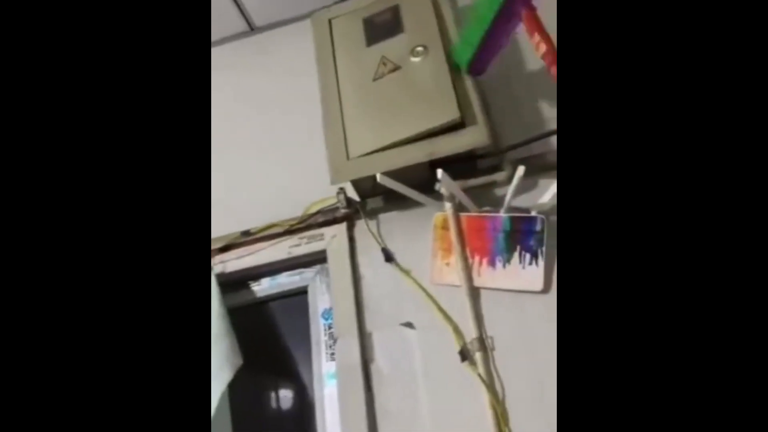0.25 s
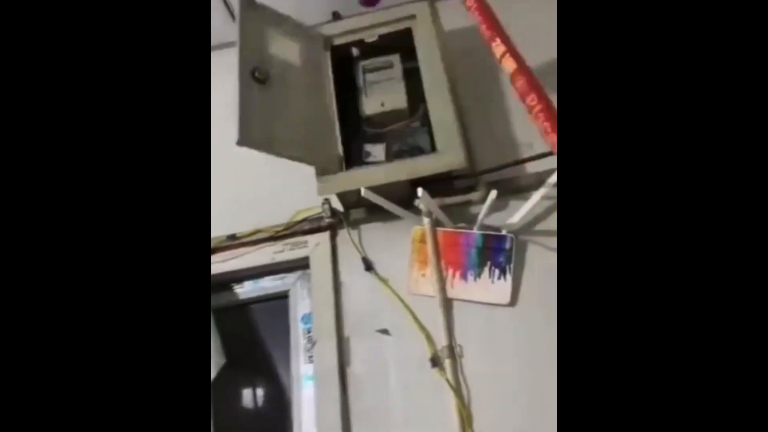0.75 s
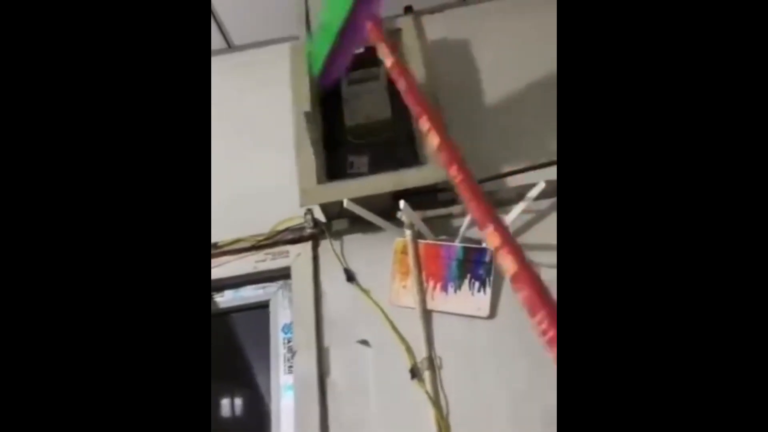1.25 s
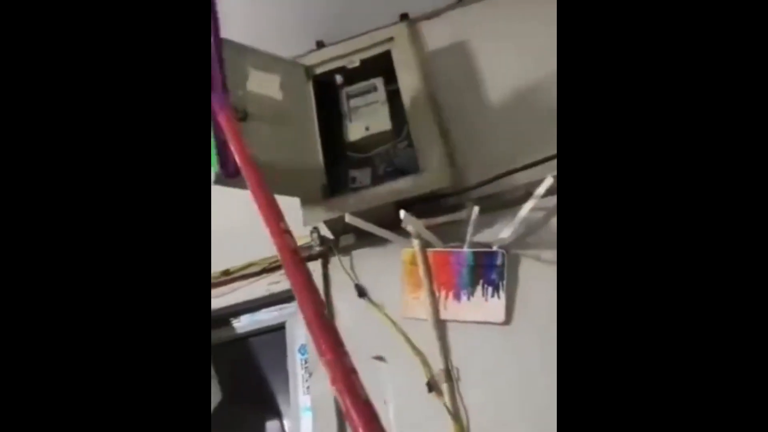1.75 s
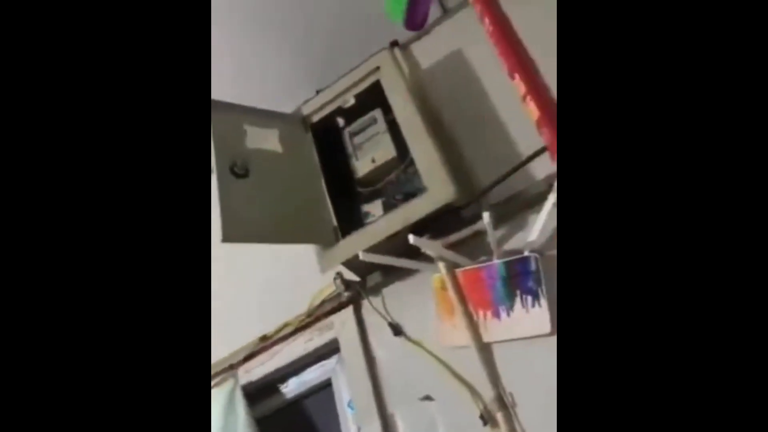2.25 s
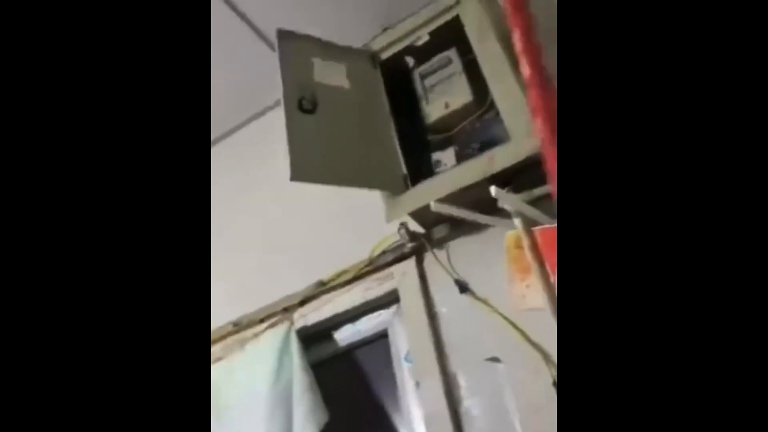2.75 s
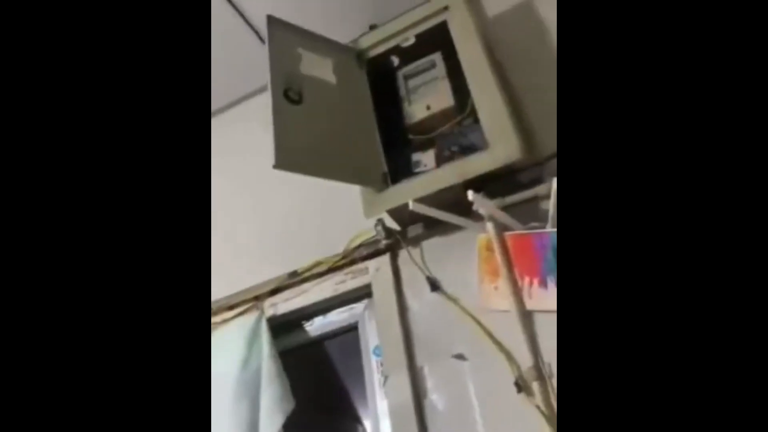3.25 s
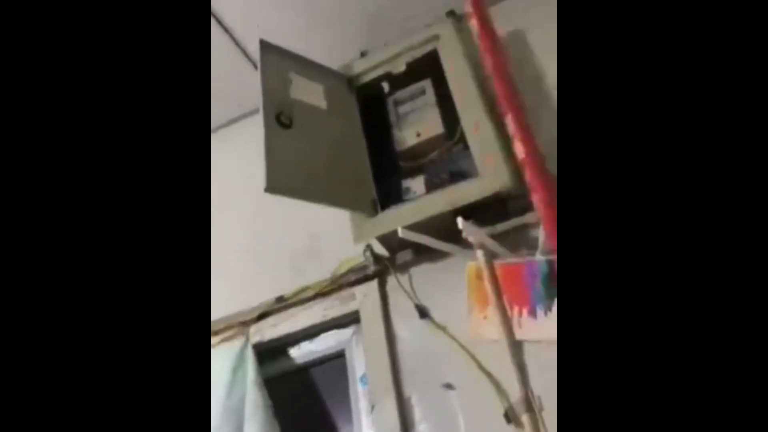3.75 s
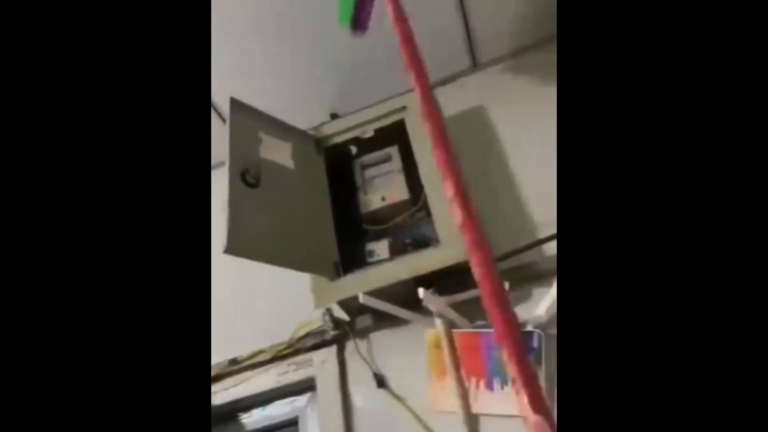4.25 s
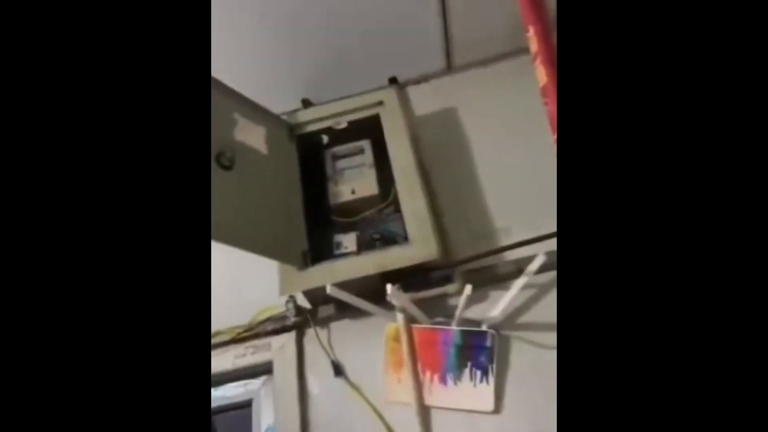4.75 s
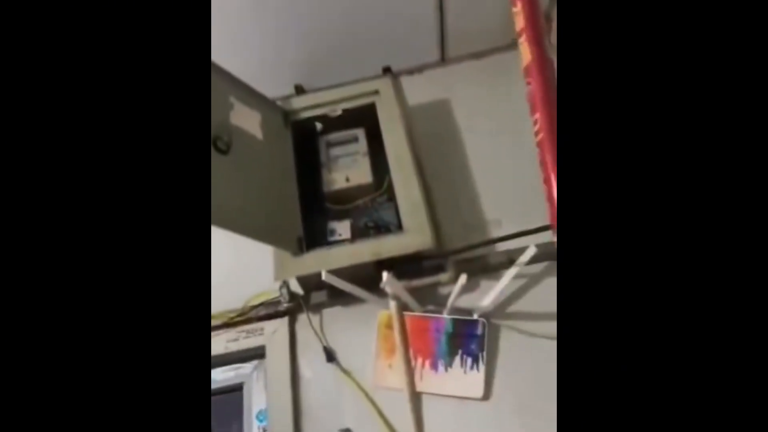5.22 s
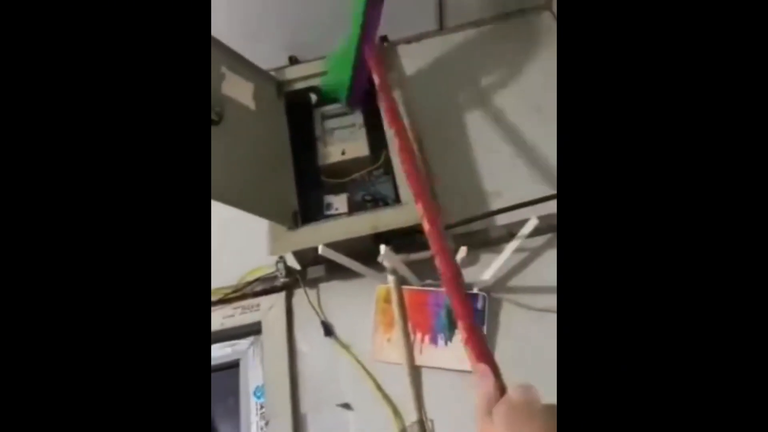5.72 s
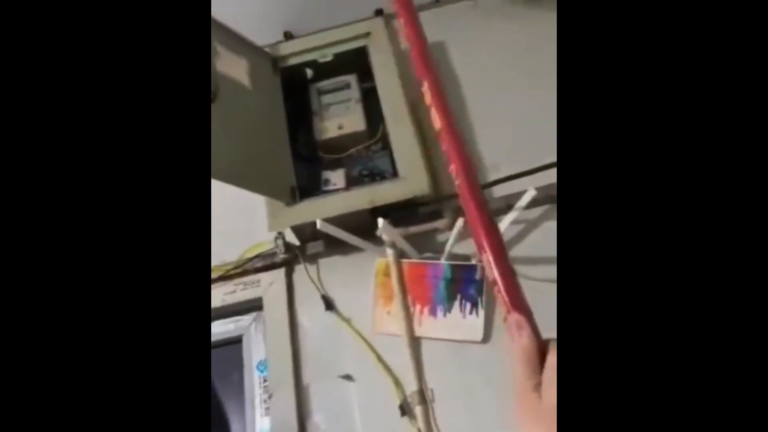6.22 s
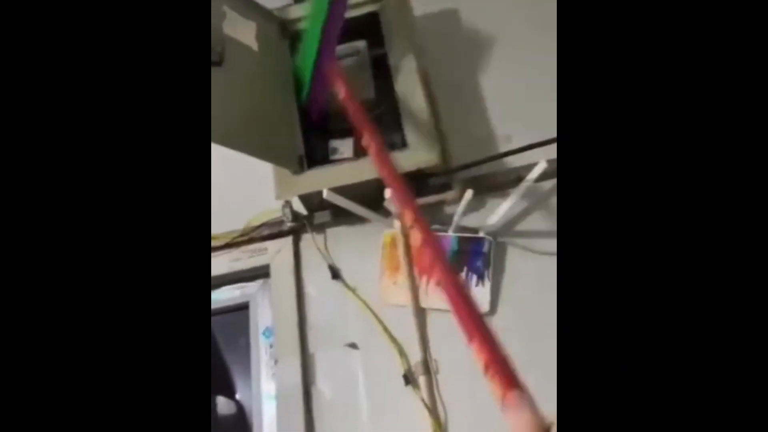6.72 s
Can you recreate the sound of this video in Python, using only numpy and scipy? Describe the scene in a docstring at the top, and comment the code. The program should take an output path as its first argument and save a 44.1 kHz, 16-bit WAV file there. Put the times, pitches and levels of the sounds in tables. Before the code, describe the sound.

A broom hits a sheet-metal wall cabinet close to the microphone in a bare room. From 0.1 to 0.8 seconds there are quiet ticks, knocks and bristly scrapes. A moderate tinny clatter comes at 1.1 to 1.5, then fades to faint murmur, hiss and wavering hum. Small low knocks at 2.15 to 2.25 lead to a loud hollow bang at 2.7, ringing with a short rattle. Another bang lands at 3.45 with a low thud just after, then a third at 3.96, whose door shudders and booms past 4.1. A lighter clack sounds at 4.56, followed by near quiet. At 5.5 a heavy bang booms deeply, its loose rattle fading by 6. At 6.33 a sharp, bright crack dips briefly, then bursts into dense clanking and jangling metal that slowly decays to the end near 7.

```python
"""In a bare room, a broom knocks and scrapes a sheet-metal wall cabinet and its door, near the microphone.
Each blow cracks and thumps, then noise rings through the door's modes as a dying rattle.
Clanks, low thuds and box booms are fading tones; the door shudders on after the hardest blows; low noise booms.
Behind them lies a room tone of murmur, hiss and a faint wavering hum, all of it filtered noise."""
import sys
import numpy as np
from scipy import signal
from scipy.fft import rfft, irfft, next_fast_len
from scipy.io import wavfile
from scipy.ndimage import uniform_filter1d, minimum_filter1d, map_coordinates

SR = 44100
rng = np.random.default_rng(int(sys.argv[2]) if len(sys.argv) > 2 else 0)


def to_wav(s):
    """Save 16-bit WAV."""
    ch = np.atleast_2d(s).T  # columns
    pcm = np.round(np.clip(ch, -1, 1) * 32767)  # PCM
    wavfile.write(sys.argv[1], SR, pcm.astype(np.int16))


N = 307804


def amp(db):
    """Gain of a level in dB."""
    return 10 ** (np.asarray(db) / 20)


def unit(x):
    """x at rms 1."""
    return x / np.sqrt(np.mean(x ** 2) + 1e-20)


def along(points, hz):
    """Value at hz between (Hz, value) points on a log frequency axis."""
    f, v = np.transpose(points)
    return np.interp(np.log(hz + 1), np.log(f + 1), v)


def curves(rows):
    """One value per sample for each column after the time."""
    s, *cols = np.transpose(rows)
    return [np.interp(np.arange(N) / SR, s, c) for c in cols]


def wobble(rate):
    """A smooth random curve, rate knots a second."""
    return map_coordinates(rng.standard_normal(int(N * rate / SR) + 4), [np.arange(N) * rate / SR])


def filtered(x, response):
    """x times a response of frequency."""
    n = x.shape[-1]
    m = next_fast_len(n + SR // 10)
    return irfft(rfft(x, m) * response(np.fft.rfftfreq(m, 1 / SR)), m)[..., :n]


def noise(spectrum):
    """Coloured noise of rms 1."""
    return unit(filtered(rng.standard_normal(N), lambda hz: amp(along(spectrum, hz))))


def peak(hz, centre_hz, width_hz):
    """A resonance of height 1."""
    return 1 / (1 + (2 * (hz - centre_hz) / width_hz) ** 2)


def patches(shape, bands, frames):
    """Random map of rms 1 over frequency and time, smoothed across so many bands and frames."""
    smooth = uniform_filter1d(rng.standard_normal(shape), size=bands, axis=0)
    return unit(uniform_filter1d(smooth, size=frames, axis=1))


def cabinet():
    """Each blow swells and cracks, then the rattle dies faster towards its end, at a pace set by pitch."""
    # Blows and scrapes. Each row: start in seconds, strength in dB, thump, body, clang and bristle hiss in dB,
    # t60 in seconds (scaled by pitch below), rise in seconds (2 ms at least), tick in dB,
    # knock in Hz, knock in dB. The levels are relative.
    blows = [(0.114, -52.5, -7, 1, 9.5, 15.5, 1, 0.017, -35, 263, 12),
             (0.239, -36.5, -4, -18, 0, -11, 1, 0.0072, -8, 713, 12.5),
             (0.282, -41.5, -9, 5, -0.5, 10, 0.82, 0.043, -18, 320, 20),
             (0.324, -35, -14, -3, 3.5, 4.5, 0.44, 0.0022, 4.5, 188, -2),
             (0.395, -38, -7, -4.5, 2, -28, 1, 0.01, 1, 1013, 14.5),
             (0.457, -56.5, -8, -5, 7, 18.5, 0.86, 0.017, -16, 142, 44),
             (0.621, -36.5, -5, -24, -1, -2, 0.24, 0.006, -1, 338, 13),
             (0.676, -28.5, -11.5, -8, 0.5, 0.5, 0.52, 0.05, -13, 178, 5),
             (0.769, -40, -15, -1.5, -6.5, -16, 1, 0.0015, -11, 138, 31.5),
             (1.133, -25, -9.5, -13.5, 0, 5, 0.68, 0.0093, -18, 1214, 7.5),
             (1.28, -24, -5, -7.5, -1.5, -0.5, 0.41, 0.0018, -1, 852, 12.5),
             (1.337, -25.5, -15, -9, -0.5, -1.5, 0.61, 0.022, -6, 166, 12.5),
             (1.473, -32, -7, -6, 3, 1.5, 1, 0.024, 0.5, 189, -9),
             (1.539, -46.5, -1, 1, -2, 8, 0.41, 0.019, -15, 332, 28),
             (1.682, -48.5, -5, -17, 5, 11, 0.53, 0.028, -1, 240, 23),
             (2.152, -39.5, 3, -9, -10, -18, 0.29, 0.022, -11, 340, 19),
             (2.217, -33.5, -9, -2.5, -6.5, -8, 0.23, 0.059, -3, 333, 8),
             (2.238, -44.5, -31, -10, -4, 2, 0.5, 0.01, -15, 1164, 26),
             (2.256, -38.5, -31, -10, -9, -3.5, 0.56, 0.0054, -8, 930, 14),
             (2.495, -43, -27, -2.5, -3, 3.5, 0.15, 0.011, -6, 232, 9),
             (2.602, -42.5, -29, -21, 2, 10, 0.9, 0.066, -27, 236, 0),
             (2.693, -9.5, -13.5, -11.5, -2.5, 1, 0.6, 0.0086, -32, 437, 2),
             (3.068, -51.5, -1, -5.5, 2.5, 12.5, 0.49, 0.042, 1, 151, 14),
             (3.269, -61.5, 6, -3, 14, 15, 1, 0.0049, 11, 141, 0),
             (3.443, -12, -12.5, -12, -1, 1, 0.85, 0.0076, 4, 192, 10),
             (3.549, -26, 0.5, -2.5, 1.5, -1.5, 0.36, 0.01, -24, 159, 3),
             (3.762, -42.5, 0.5, -15, -21, -6.5, 0.74, 0.01, -14, 179, -4),
             (3.796, -36, -14, -9, -34, -28, 0.15, 0.012, -9, 742, 14.5),
             (3.956, -10, -14.5, -10, -1, -2.5, 0.48, 0.007, -13, 421, 6),
             (4.02, -27.5, -12.5, -2, 3, -20, 0.93, 0.0071, -28, 147, -8),
             (4.098, -35.5, -10, 3.5, 3, 13, 0.23, 0.005, 13, 2530, 9),
             (4.14, -34.5, 6, 4, 4, -17, 0.6, 0.018, -9, 146, -1),
             (4.447, -35.5, 0.5, -4, -23.5, -25, 0.88, 0.069, -8, 164, 10),
             (4.56, -21, -34, -15, -9, -22.5, 0.64, 0.004, 2, 807, 10),
             (5.491, -28, -12, -18, 9, 17.5, 0.46, 0.0067, -14, 220, 4),
             (5.515, -9.5, -12, -8.5, -4, -23.5, 0.63, 0.0081, -4.5, 198, 10.5),
             (5.613, -31, -17, -3.5, -9, -10.5, 0.94, 0.0088, -1, 352, 20.5),
             (5.74, -30, -24, -1, -4, -12.5, 0.72, 0.028, -18, 500, 2),
             (5.803, -25.5, -33, -3.5, -11, -34, 0.6, 0.012, -19.5, 642, 6.5),
             (6.001, -37.5, -5.5, 0, -18, -10, 0.55, 0.0047, -3, 792, 14.5),
             (6.313, -42, -17, -16, 15, 21.5, 0.18, 0.0051, -21, 147, -12),
             (6.329, -8, -24, -11, 6.5, -1.5, 0.1, 0.0028, 2, 970, -13),
             (6.367, -18.5, -20, -9, -2, -21, 0.48, 0.02, -13, 506, 15),
             (6.46, -13, -25, -12, -8, -10.5, 0.98, 0.046, -21, 684, 8.5)]
    # How long each pitch lasts. Each row: frequency in Hz, share of the blow's t60.
    lasting = [(150, 1.17), (700, 0.52), (3000, 0.66), (9000, 0.69)]
    crack_db, crack_t60, tick_t60 = -11, 0.31, 0.029  # contact over the rattle; seconds
    lead, size = SR // 16, SR * 7 // 8  # samples ahead of the start, and in all
    out = np.zeros(N + lead + size)
    t = (np.arange(size) - lead) / SR
    for s, db, thump_db, body_db, clang_db, hiss_db, t60, rise, tick_db, knock_hz, knock_db in blows:
        since = t - 0.49 * rise  # time after the loudest moment
        after = np.clip(since, 0, None)

        hz, frame, z = signal.stft(rng.standard_normal(size), SR, nperseg=256)
        lifetime = np.clip(t60 * along(lasting, hz)[:, None], .02, 9)
        age = np.clip(frame - lead / SR, 0, None) / lifetime
        z = z * amp(2.1 * patches(z.shape, 4, 8) - 60 * age ** 1.21)
        rattle = signal.istft(z, SR, nperseg=256)[1][:size]
        flicker_db = 0.78 * np.interp(t, t[::220], rng.standard_normal(len(t[::220])))
        rattle = rattle * amp(flicker_db) * chatter(size, 90, -11)

        crack = amp(crack_db - 60 * after / crack_t60)
        tick = amp(tick_db - 60 * after / tick_t60)
        rattle = rattle * (1 + crack + tick)

        tilt = [(190, thump_db + 0.5), (370, body_db), (650, 1.3), (1300, 0.3), (2200, clang_db + 0.5),
                (3200, 0.7 * clang_db + 0.43 * hiss_db + 3.5), (4800, hiss_db + 4.0)]
        rattle = through_door(rattle, tilt, knock_hz, knock_db)

        # each rattle is levelled by its first moments, apart from its tilt
        bins = np.arange(24, 160)
        start = np.abs(rfft(rattle[lead:lead + 2048]))[bins]
        untilt = amp(-2 * along(tilt, bins * SR / 2048))
        rattle = rattle / np.sqrt(np.mean(start ** 2 * untilt))

        swell = amp(-11 * np.clip(-since, 0, None) / max(rise, .002))
        # the struck spot swings a few times at its own pitch
        swing = np.sin(2 * np.pi * knock_hz * t + rng.uniform(0, 2 * np.pi))
        knock = swell * amp(knock_db - 52.5 - 60 * after / 0.15) * swing
        fade = np.clip(10 * (t[-1] - t), 0, 1)
        out[round(s * SR):][:size] += amp(db + 38.5) * swell * fade * (rattle + knock)
    return out[lead:lead + N]


def through_door(x, tilt, knock_hz, knock_db):
    """x rings the sheet; two random colourings of the rattle fade back and forth."""
    # Colour of the sheet's rattle. Each row: frequency in Hz, relative level in dB.
    sheet = [(65, -17.5), (110, 5), (242, 2.5), (333, -1), (366, -4), (450, -9.5), (1200, -13.5),
             (1840, -15), (2140, -14.5), (3980, -18.5), (8760, -30), (9800, -28), (12700, -68),
             (21600, -120)]
    trade_hz = 5.15
    t = np.arange(len(x)) / SR
    share = .5 + .5 * np.sin(2 * np.pi * trade_hz * t + rng.uniform(0, 2 * np.pi))

    def ring(hz):
        """Sheet colour and tilt times a fresh draw of the door's modes."""
        return amp(along(sheet, hz) + along(tilt, hz)) * door_modes(hz, knock_hz, knock_db)

    one = filtered(x, ring)
    other = filtered(x, ring)
    return share * one + (1 - share) * other


def door_modes(hz, knock_hz, knock_db):
    """The door's modes, at new strengths on every call, over a dense mass of small ones."""
    # Door modes. Each row: frequency in Hz, width in Hz, mean level over the rattle in dB.
    modes = [(201.6, 14, -5.5), (337, 84, -3), (398.6, 4.5, 14), (449.4, 17, 4), (498, 57, 5.5),
             (633, 5.3, 3), (717, 24, 0.5), (765, 11, 3.5), (860, 7.4, -2.5), (943, 8.8, -7.5),
             (1032, 33, 1), (1120, 4.6, 5), (1230, 86, -8), (1355, 110, -5), (1506, 36, 1), (1680, 126, -1),
             (1864, 50, -2), (2045, 36, -5.5), (2308, 31, -3), (2485, 94, -3.5), (2600, 15, -5.5),
             (2610, 170, -7), (2764, 77, -6), (2990, 94, -3), (3220, 75, -4.5), (3440, 16, -21),
             (3600, 12, 3.5), (3916, 72, -3.5), (4200, 14, -0.5), (4500, 11, 5)]
    lift = sum(amp(db + rng.normal(0, 0.6)) * peak(hz, centre, width) for centre, width, db in modes)
    knock = amp(knock_db - 9.5) * peak(hz, knock_hz, 47)
    small = map_coordinates(rng.standard_normal(1200), [hz / 30])  # a knot every 30 Hz
    return (1 + lift + knock) * amp(3.1 * small)


def chatter(size, rate, loud_db):
    """Gain of loose parts ticking at random moments over the rattle, rate ticks a second."""
    ticks = (rng.random(size) < rate / SR) * rng.exponential(1, size)
    decay = amp(-60 * np.arange(SR // 20) / SR / 0.0088)  # t60 of 8.8 ms
    return 1 + amp(loud_db) * signal.fftconvolve(ticks, decay)[:size]


def clanks():
    """Each tone is slightly unsteady: it swells, crests at its loudest moment and dies."""
    # Panel clanks, low thuds and box booms as single tones. Each row: loudest moment in seconds,
    # frequency in Hz, peak in dB, time to gain 8 dB in seconds (2 ms at least), t60 in seconds (30 ms at least).
    tones = [(0.334, 1157, -38, 0.0066, .1), (0.4, 1102, -36, 0.0084, 0.08), (0.325, 1940, -31, .002, .04),
             (1.14, 4020, -33, .006, 0.072), (1.282, 900, -23, .002, .04), (1.349, 3940, -31, .008, 0.11),
             (1.48, 2500, -37, .006, .15), (1.292, 2537, -26, .006, 0.084), (1.356, 341, -28, .012, 0.14),
             (2.159, 117, -25, 0.0088, 0.091), (2.2, 960, -41, 0.024, .15),
             (2.223, 384, -21.5, 0.0076, 0.094), (2.263, 385, -18, .007, .045),
             (2.696, 188, 1, 0.0023, 0.056), (2.714, 210, -15.5, .004, 0.045),
             (2.715, 654, -16.5, 0.0074, 0.16), (2.727, 481, -15, .02, 0.18), (2.75, 183, -11, 0.017, 0.14),
             (2.784, 1156, -25, 0.013, 0.098), (2.79, 221, -18, 0.015, .12), (2.825, 150, -24, .008, .1),
             (2.859, 139.5, -21, 0.021, 0.18), (3.448, 192, -1.5, 0.0027, 0.11),
             (3.458, 458, -13.5, 0.0059, 0.12), (3.488, 336, -19.5, 0.013, 0.16),
             (3.555, 104, -8.5, 0.0033, 0.037), (3.952, 190, -11.5, 0.0036, .05),
             (3.972, 183, -10, 0.0043, 0.11), (3.978, 439, -7, 0.0064, .1),
             (3.97, 1050, -13, 0.0064, 0.054), (3.954, 2670, -16, 0.0027, 0.07),
             (4.047, 95, -14, .004, 0.072), (4.024, 85, -11, .004, .08), (3.967, 2420, -18, 0.0057, 0.07),
             (3.965, 642, -9.5, 0.0045, 0.074), (4.025, 1340, -23.5, .006, .1),
             (4.106, 2490, -25, 0.0195, .2), (4.144, 146.5, -12.5, 0.0093, 0.19),
             (4.566, 900, -24, .003, .08), (4.576, 520, -22.5, 0.0058, 0.071),
             (4.67, 480, -31.5, 0.022, 0.09), (5.519, 199, -8.5, 0.004, 0.062),
             (5.52, 907, -10, 0.0022, 0.066), (5.521, 2530, -13, 0.0068, 0.072),
             (5.536, 80, -9.5, 0.009, .15), (5.585, 52, -14, 0.017, .25), (5.68, 51.6, -15.5, 0.028, .3),
             (5.79, 53.8, -17, .03, 0.38), (5.537, 713, -13.5, 0.0071, .12),
             (5.616, 1010, -24, 0.0102, .12), (5.64, 1224, -30, .02, 0.13), (5.6, 302, -24, .02, .2),
             (5.729, 109, -20, .008, .1), (5.775, 110.5, -20.5, .01, .12), (5.762, 1025, -34, .008, 0.12),
             (5.65, 344.4, -20, 0.081, 0.35), (5.92, 348, -38.5, 0.024, 0.21),
             (6.327, 2770, -6, 0.0018, .03), (6.36, 484, -27, .004, .05), (6.372, 960, -27, .006, .1),
             (6.413, 70, -20, 0.022, 0.27), (6.376, 322, -20.5, 0.0051, 0.093),
             (6.42, 293, -16, .008, 0.077), (6.455, 658, -16, 0.011, .35), (6.476, 1860, -14.5, .015, 0.17),
             (6.451, 934, -18.5, .01, .12), (6.465, 2950, -18.5, 0.019, 0.18),
             (6.485, 782, -14.5, 0.0096, 0.17), (6.485, 515, -15, 0.023, .15), (6.505, 56, -16.5, .03, .3),
             (6.516, 1006, -18, 0.012, .12), (6.537, 284, -14.5, .01, 0.25), (6.565, 1920, -20, .015, 0.18),
             (6.599, 1610, -23, 0.011, .15), (6.61, 700, -21.5, .015, .2), (6.626, 58.4, -17.5, .04, 0.5),
             (6.77, 67, -21, .03, .3), (6.495, 453, -10, .03, 0.27), (6.531, 335, -18, 0.0061, 0.1),
             (6.55, 581, -17, .012, .15), (6.644, 486, -21, 0.036, 0.24), (6.67, 343, -18.5, 0.022, 0.17),
             (6.683, 149, -21, .015, 0.21), (6.69, 679, -19.5, .015, 0.14), (6.7, 1810, -21, .012, 0.18),
             (6.732, 328, -14.5, 0.013, .15), (6.782, 2820, -30, .02, 0.34),
             (6.814, 486, -19.5, 0.0087, 0.32), (6.86, 428, -21, 0.01, 0.21),
             (6.959, 452, -26.5, 0.025, .15)]
    t, out = np.arange(N) / SR, np.zeros(N)
    drift = np.cumsum(wobble(40)) / SR
    for s, hz, db, rise, t60 in tones:
        near = slice(round((s - .1) * SR), round((s + .4) * SR))
        since = t[near] - s
        level_db = db - np.where(since < 0, -8 * since / max(rise, .002), 60 * since / max(t60, .03))
        unsteady = since + 0.00445 * (drift[near] - drift[round(s * SR)])
        out[near] += amp(level_db) * np.cos(2 * np.pi * hz * unsteady)
    return out


def shudder():
    """Loose sheet clatters on through the door's modes, now these, now those: it sets in, swells and fades."""
    # The door after the hardest blows. Each row: start in seconds, swell in seconds, start level in dB,
    # peak level in dB, fading in dB per second, then bass, body and treble tilt in dB.
    shudders = [(4.03, 0.072, -24.5, -16, 104, -1, 3, 10.5), (5.539, 0.1, -33.5, -16.5, 91, 5, 2, 6.5),
                (6.372, 0.07, -26, -13, 20, -10, 2, 7)]
    rise_s = 0.045  # time to gain 40 dB before the start
    rise_s, fall_db = rise_s, 40
    lead, size = SR // 20, SR
    t, out = (np.arange(size) - lead) / SR, np.zeros(N + size)
    for s, swell, start_db, db, fading_db, bass_db, body_db, treble_db in shudders:
        level_db = np.interp(t, [0, swell], [start_db, db]) - fading_db * np.clip(t - swell, 0, None)
        level_db = level_db - fall_db * np.clip(-t, 0, None) / rise_s
        tilt = [(200, bass_db), (420, body_db), (750, 5.5), (1400, 4.8),
                (4000, treble_db), (8000, treble_db - 3.5)]
        z = signal.stft(rng.standard_normal(size) * chatter(size, 140, -23.5), nperseg=512)[2]
        clatter = signal.istft(z * amp(3.35 * patches(z.shape, 3, 7)), nperseg=512)[1][:size]
        clatter = clatter * amp(0.24 * wobble(43) + 0.87 * wobble(12.15))[:size]
        clatter = through_door(clatter, tilt, 610, 3.8)
        out[round(s * SR) - lead:][:size] += amp(level_db) * unit(clatter)
    return out[:N]


def boom():
    """Low noise from the shaken box: each boom rises fast and dies away, in lumps, over a steady rumble."""
    # Box and wall booming after blows. Each row: loudest moment in seconds, peak in dB,
    # t60 in seconds (50 ms at least).
    booms = [(0.21, -38, 3.3), (0.66, -26.5, 0.57), (1.18, -38, 1.6), (1.329, -28.5, 1.5),
             (1.65, -31.5, 0.41), (2.04, -48, 1), (2.16, -43, 0.17), (2.7, -26.5, 1.1), (3.46, -20.5, 0.4),
             (3.575, -24.5, 0.63), (3.97, -22, 1), (4.045, -18, 1.54), (4.2, -32, 0.45), (4.43, -34.5, 4.1),
             (5.528, -14, 0.53), (5.681, -19.5, 1.34), (6.05, -38, 7.1), (6.509, -29, 0.67),
             (6.621, -22, 3.2)]
    # Colour of the boom. Each row: frequency in Hz, relative level in dB.
    boom_colour = [(13, -38.5), (22, -17.5), (49, 11), (108, 7.5), (170, -3), (220, -6.5), (370, -120)]
    rise_s, rumble_db = 0.011, -49.5  # time to gain 11 dB; level of the rumble
    t = np.arange(N) / SR
    power = amp(2 * rumble_db)
    for s, db, t60 in booms:
        drop_db = np.where(t < s, 11 * (s - t) / rise_s, 60 * (t - s) / max(t60, .05))
        power = power + amp(2 * (db - drop_db))
    lumpy = unit(amp(0.81 * wobble(7.7)) * noise(boom_colour))
    return np.sqrt(power) * lumpy


def room_tone():
    """Murmur and hiss are coloured noise; the hum is noise in so narrow a band that it wavers."""
    # Room tone over time. Each row: time in seconds, murmur, hiss and hum level in dB.
    tone_levels = [(0, -51, -53.5, -51), (.8, -60.5, -55, -54.5), (1.7, -44, -49, -48),
                   (2.5, -46.5, -48, -45), (3.2, -53.5, -54.5, -53), (3.9, -43.5, -49, -53),
                   (4.6, -48.5, -53.5, -49.5), (5.4, -49, -53.5, -54), (6.3, -47, -49.5, -56)]
    # Colours of the murmur and of the hiss. Each row: frequency in Hz, relative level in dB.
    murmur_colour = [(65, -32.5), (110, -3), (167, -14), (252, -4.5), (270, -14), (335, -12.5),
                     (800, -33.5), (1040, -56.5), (1760, -120)]
    hiss_colour = [(260, -37), (450, 11), (546, -7), (590, 7.5), (707, 3), (975, 6), (1400, -1),
                   (2170, 2.5), (2770, 1.5), (8950, -20.5), (9800, -22.5), (12700, -49), (21600, -120)]
    hum_hz = 246
    murmur_db, hiss_db, hum_db = curves(tone_levels)
    hum = unit(filtered(rng.standard_normal(N), lambda hz: peak(hz, hum_hz, 13.3) ** 2))
    low = amp(murmur_db) * noise(murmur_colour) + amp(hum_db) * hum
    hiss = amp(hiss_db + 0.39 * wobble(8.4)) * noise(hiss_colour)
    return amp(0.43 * wobble(19)) * low + hiss


def scene():
    """The sum of all sources, alike on both channels."""
    return np.tile(cabinet() + clanks() + shudder() + boom() + room_tone(), (2, 1))


def record(dry):
    """Microphone colour, brief dips, a limiter, a treble that differs left to right and the band limit."""
    # Microphone response. Each row: frequency in Hz, gain in dB.
    microphone = [(8300, -5.5), (9300, -15.5), (9800, -47.5)]
    # The level dips briefly just after two hard blows. Each row: time in seconds (the fall begins 2 ms ahead),
    # fall, hold and return in seconds, gain above the bass in dB, gain of the bass in dB.
    dips = [(4.007, 0.004, 0.009, 0.009, -8, -9), (6.337, 0.0057, 0.0095, 0.013, -29, -15)]
    # The channels differ only in the treble. Each row: frequency in Hz, gain of the side signal in dB.
    side_colour = [(4100, -100), (4400, -30.5), (6500, -10.5), (9000, -21), (9800, -43)]
    ceiling, top_hz = .68, 10600  # limiter ceiling on the middle; band limit
    t = np.arange(N) / SR
    mid = filtered(dry[0], lambda hz: amp(along(microphone, hz)))

    bass = filtered(mid, lambda hz: peak(hz, 0, 980) ** 2)
    shapes = [np.interp(t, np.cumsum([s - .002, fall, held, back]), [0, 1, 1, 0])
              for s, fall, held, back, *_ in dips]
    dip_db, bass_dip_db = np.transpose(dips)[4:] @ shapes
    mid = amp(dip_db) * (mid - bass) + amp(bass_dip_db) * bass

    # the gain that holds the tallest peaks, spread around them and smoothed
    need = minimum_filter1d(ceiling / np.maximum(np.abs(mid), ceiling), size=441)
    mid = mid * uniform_filter1d(need, size=221)

    flipped = mid * np.sign(wobble(300))  # sign flips unlink it from the middle
    side = filtered(flipped, lambda hz: amp(along(side_colour, hz)))
    side = side * amp(np.clip(12 * wobble(5), -40, 9))  # the width comes and goes
    return filtered(np.array([mid + side, mid - side]), lambda hz: hz < top_hz)


dry = scene()
out = record(dry)
to_wav(out)
```